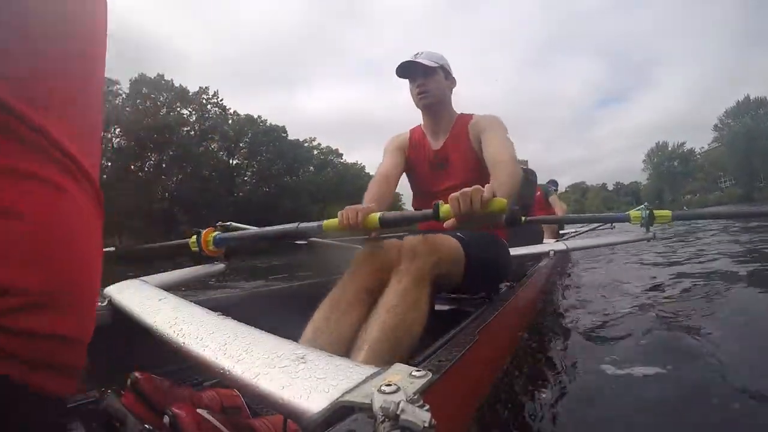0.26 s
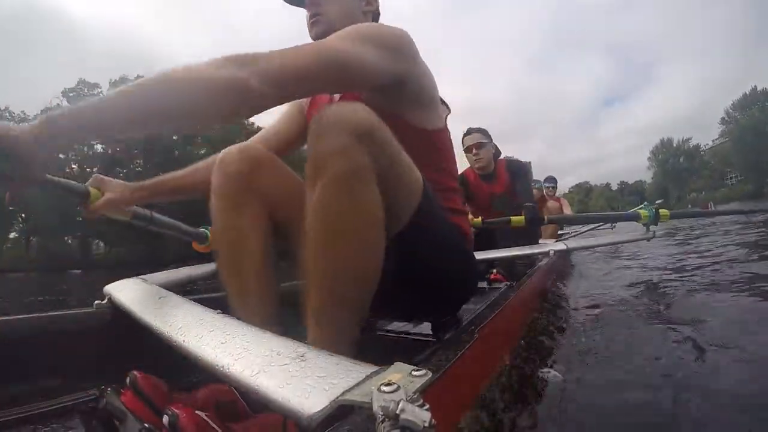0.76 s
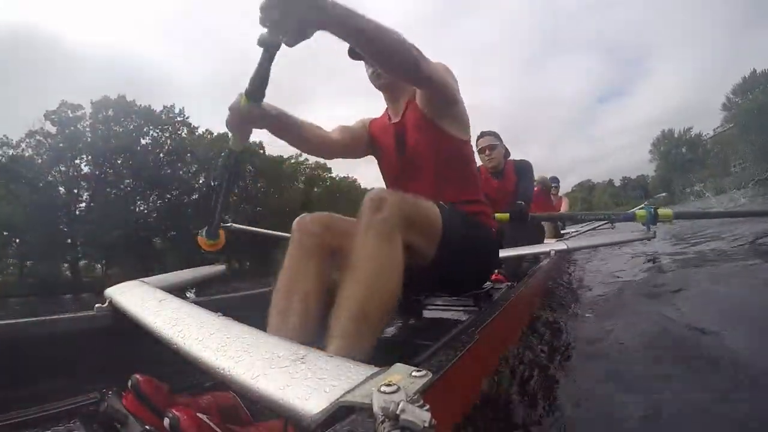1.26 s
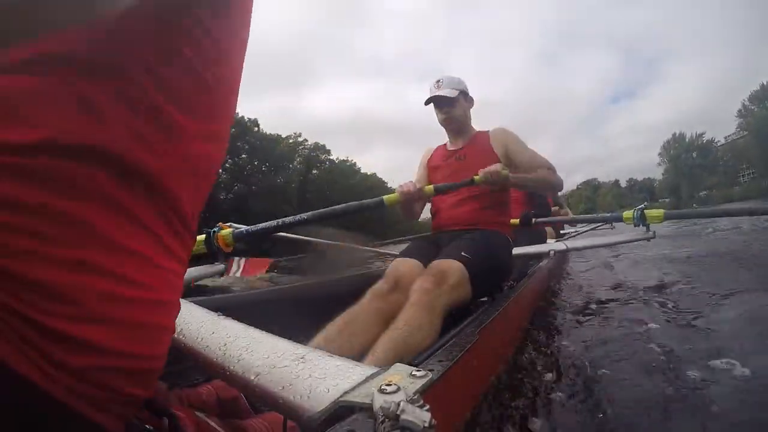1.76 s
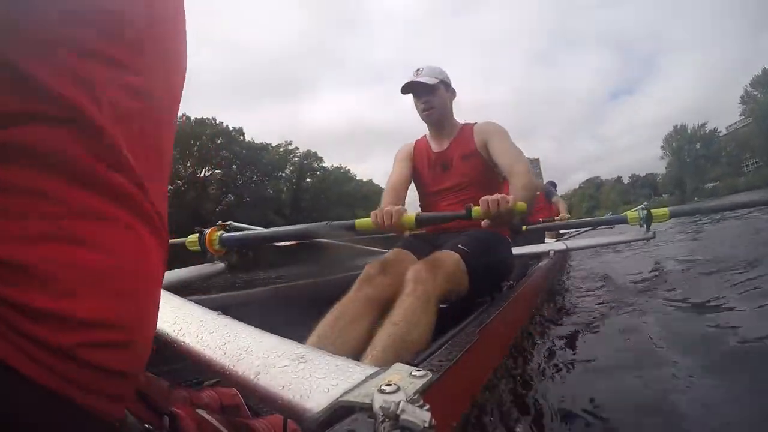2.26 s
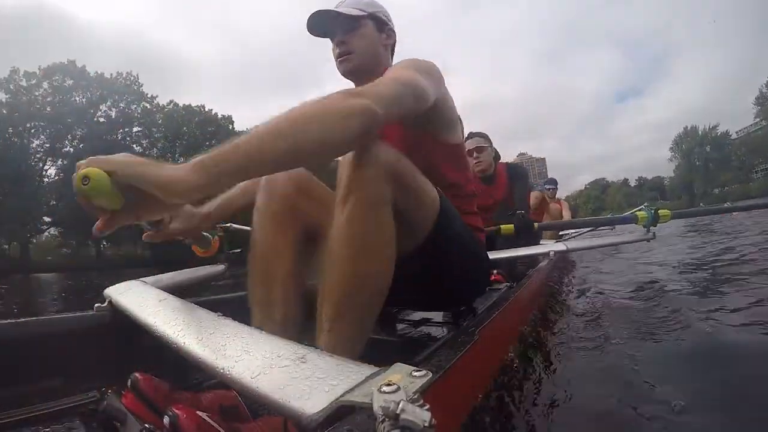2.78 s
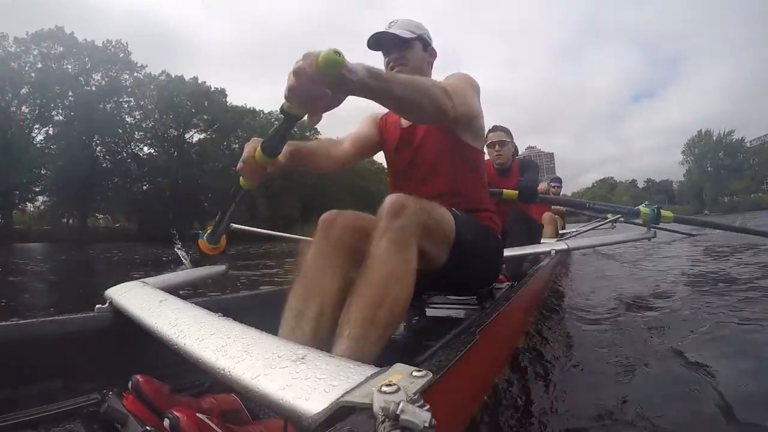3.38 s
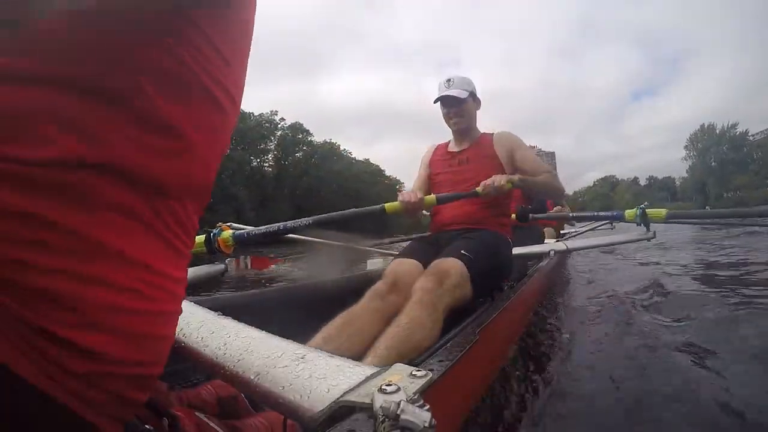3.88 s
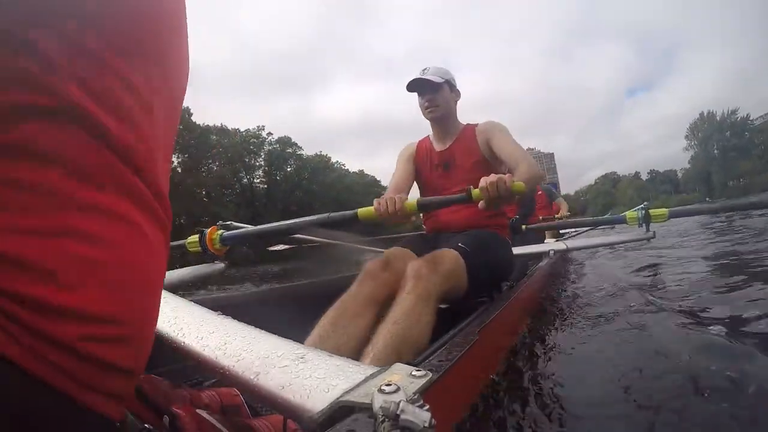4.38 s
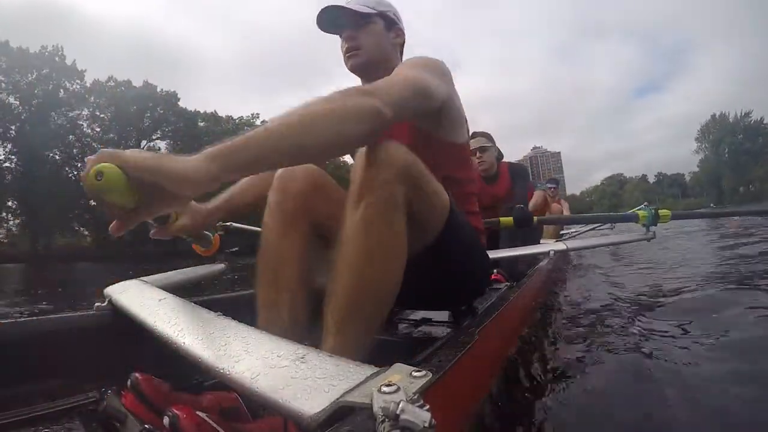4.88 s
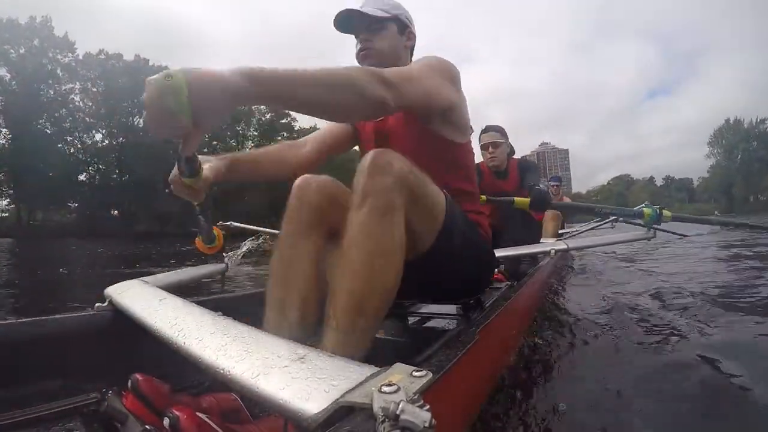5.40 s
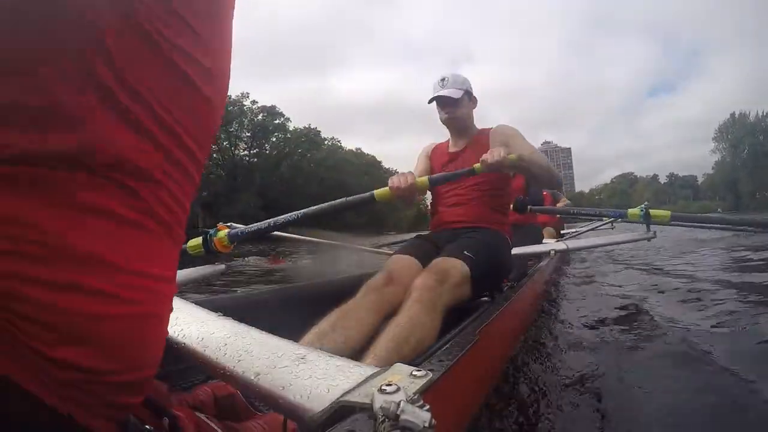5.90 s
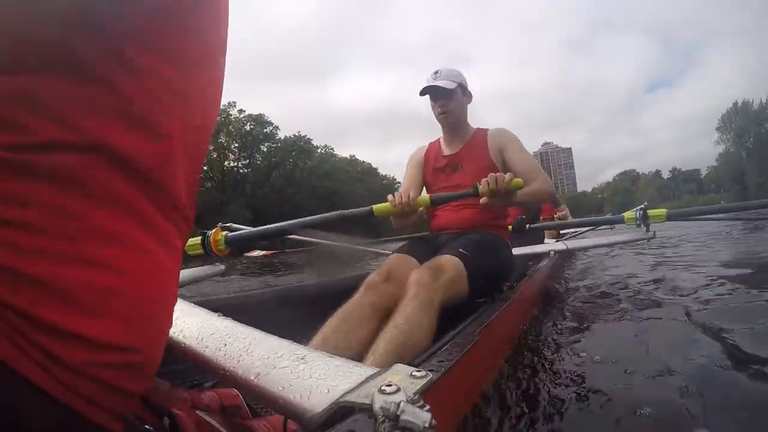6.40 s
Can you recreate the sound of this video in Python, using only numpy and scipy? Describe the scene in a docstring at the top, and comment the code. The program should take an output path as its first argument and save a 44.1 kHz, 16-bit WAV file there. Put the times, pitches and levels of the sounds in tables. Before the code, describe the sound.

Close hull-mounted sound of a rowing boat on open water. From 0.2 s seat wheels rumble grittily, and from 0.4 to 0.7 s oars knock loudly in their locks: dense hollow clacks, plastic ticks, tiny metallic snaps and deep hull thumps. Around 1.4 to 1.9 s, as water rush swells, a lighter seat rumble, knocks and a creaky run of ticks follow. The rush ebbs; at 2.4 to 2.8 s the second loud clatter bursts out. About 3 to 3.3 s is quieter, with low booming and small water slaps, then a thump at 3.4 s and knocks and ticks near 3.8 s within the surge. The third rumble and clatter fill 4.4 to 5 s. A quiet lull with a slap at 5.2 s leads to rolling, knocks and ticks around 5.7 to 6 s. Water rushes, a wavelet slaps at 6.4 s, and a new rumble and thump start at 6.6 s.

```python
"""Seats rumble along their tracks as a racing shell rows three strokes: wheels on grit ring the deck.
Oars knock in their oarlocks, as bursts of noise through resonances, and their collars tick by stick-slip.
The thin hull booms underneath as noise-driven and shoved resonances, heard from a microphone on the hull.
Water rushes past with every surge as coloured grains, wavelets slap the hull, and a fine hiss lies behind."""
import sys
import numpy as np
from scipy import signal
from scipy.fft import rfft, irfft, next_fast_len
from scipy.io import wavfile
from scipy.ndimage import uniform_filter1d, minimum_filter1d, map_coordinates

SR = 44100
rng = np.random.default_rng(int(sys.argv[2]) if len(sys.argv) > 2 else 0)


def put_to_file(sound):
    """Save the sound as 16-bit audio at rate SR, in the file named by the first command-line argument."""
    columns = np.atleast_2d(sound).T  # one column per channel
    safe = np.clip(columns, -1, 1)
    whole_steps = np.round(safe * 32767)
    wavfile.write(sys.argv[1], SR, whole_steps.astype(np.int16))


N = 293265  # length [samples]


def amp(db):
    """Level law: decibels to amplitude gain."""
    return 10 ** (np.asarray(db) / 20)


def unit(x):
    """Power normalisation: scale to rms 1."""
    return x / np.sqrt(np.mean(x ** 2) + 1e-20)


def crest(x):
    """Peak normalisation: scale to peak 1."""
    return x / (np.abs(x).max() + 1e-20)


def swells(rows, attack_s, fall_db_per_s):
    """Exponential build-up and decay: gain rises, holds and dies away for each (start, end, dB) row."""
    t = np.arange(N) / SR
    total = 0
    for start, end, db, *_ in rows:
        rise = 1 - np.exp(-np.maximum(t - start, 0) / attack_s)
        fall_db = fall_db_per_s * np.maximum(t - end, 0)
        total = total + amp(db - fall_db) * rise
    return total


def together(*gains):
    """Energy addition: the strength of unrelated shakings acting at once."""
    return np.sqrt(sum(g ** 2 for g in gains))


def wobble(rate):
    """Slow random modulation: a smooth curve through rate random knots a second."""
    knots = rng.standard_normal(int(N * rate / SR) + 4)
    return map_coordinates(knots, [np.arange(N) * rate / SR])


def filtered(x, response):
    """Linear filtering: multiply the spectrum by a response of frequency."""
    m = next_fast_len(len(x) + SR // 10)
    spectrum = rfft(x, m) * response(np.fft.rfftfreq(m, 1 / SR))
    return irfft(spectrum, m)[:len(x)]


def coloured(x, points):
    """Minimum-phase filtering: a causal filter with the given (Hz, dB) outline, built by cepstrum."""
    hz, db = np.transpose(points)
    size = 2048
    gain = amp(np.interp(np.log(np.fft.rfftfreq(size, 1 / SR) + 1), np.log(hz), db))
    cepstrum = irfft(np.log(gain))
    # folding the cepstrum makes the filter causal
    cepstrum[1:size // 2] *= 2
    cepstrum[size // 2 + 1:] = 0
    impulse = irfft(np.exp(rfft(cepstrum)))
    return signal.fftconvolve(x, impulse)[:len(x)]


def ringing(x, modes, stretch=1):
    """Modal resonance: parallel modes, each a squared second-order band-pass; stretch shifts their pitch."""
    def peak(f, hz, width):
        return (1j * f * width / (hz * hz - f * f + 1j * f * width)) ** 2
    return filtered(x, lambda f: sum(amp(db) * peak(f, hz * stretch, w) for hz, w, db in modes))


def softened(x, hz):
    """Contact compliance: a soft contact passes little above hz."""
    return filtered(x, lambda f: 1 / (1 + 1j * np.sqrt(2) * f / hz - (f / hz) ** 2) ** 2)


def grains(rate, spread_db):
    """Shot noise: random tiny impacts of uneven size, rms 1."""
    hit = rng.random(N) < rate / SR
    return unit(hit * rng.standard_normal(N) * amp(spread_db * rng.standard_normal(N)))


def add(track, s, sound):
    """Superposition: mix a sound in at s seconds."""
    start = max(round(s * SR), 0)
    track[start:start + len(sound)] += sound[:max(N - start, 0)]


def sustained(modes, hold):
    """Steady forced vibration: noise-driven modes, each levelled over hold seconds."""
    out = np.zeros(N)
    for hz, width, db in modes:
        x = ringing(rng.standard_normal(N), [(hz, width, 0)])
        power = np.abs(signal.hilbert(x, next_fast_len(N))[:N]) ** 2
        strength = np.sqrt(np.abs(uniform_filter1d(power, int(hold * SR))) + 1e-20)
        out += amp(db) * x / strength
    return unit(out)


# Runs of the seats: (start [s], end [s], level [dB], length of the treble dip at its start [s])
ROLLS = [(0.203, 0.372, -26, 0.23), (0.404, .54, -28.5, 0.13), (0.591, 0.679, -29.5, 0),
         (1.386, 1.508, -25, 0.14), (1.647, 1.735, -28.5, 0), (2.378, 2.663, -25.5, .24),
         (2.718, 2.776, -29.5, 0), (3.355, 3.419, -42.5, 0), (3.719, 3.871, -31, 0),
         (4.421, 4.555, -29.5, .16), (4.557, 4.934, -27.5, .235), (5.711, 5.873, -25, .17),
         (5.93, 5.996, -29, 0), (6.613, 6.7, -24.5, .1)]
# Colour of the rolling wheels: (frequency [Hz], level [dB])
TRACK = [(150, -33), (280, -0.5), (420, 1), (630, -11), (750, 2.5), (1100, 4), (1350, -21), (1930, -23.5),
         (2380, -7), (2800, -27.5), (3500, -24), (4700, -37), (6000, -35.5), (15000, -58.5)]
# Modes of deck, seat frame and oar sleeve: (frequency [Hz], width of each filter stage [Hz], level [dB])
DECK = [(397.6, 99, -2), (541.3, 75, 1.5), (751, 103, 2.5), (838, 102, -0.5), (966, 160, 1),
        (1045, 110, 2.5), (1107.5, 92, -4.5), (1215.5, 36, 0.5), (1427, 166, -5.5), (1524, 81, -10)]
FRAME = [(106, 53, 0.5), (254, 58, -4)]
SLEEVE = [(2380, 280, 9.5), (2890, 240, 3.5), (3390, 250, 4), (4040, 120, -7), (4137, 230, -2),
          (4560, 71, -4), (5300, 1500, -21)]
ROLL_ATTACK_S, ROLL_FALL_DB_PER_S = 0.021, 204
PITS_PER_S = 90  # mean rate under all the wheels together
PIT_DECK_DB, PIT_RATTLE_DB, PIT_BUMP_DB = -8.5, -21.5, -2.5  # relative to the run


def seats():
    """Rolling contact: wheels on grit ring the deck; at each pit a wheel bumps and the seat frame rattles."""
    level = swells(ROLLS, ROLL_ATTACK_S, ROLL_FALL_DB_PER_S)
    unevenness = amp(2 * wobble(70))

    def grit():
        return level * unit(grains(rate=4000, spread_db=2.0) * unevenness)

    rumble = unit(coloured(grit(), TRACK))
    ring = unit(ringing(grit(), DECK))
    pits = level * (rng.random(N) < PITS_PER_S / SR) * rng.uniform(-1.01, 1, N)
    clatter = amp(PIT_DECK_DB) * unit(ringing(pits, DECK))
    rattle = amp(PIT_RATTLE_DB) * unit(ringing(pits, SLEEVE))
    bump = amp(PIT_BUMP_DB) * unit(ringing(pits, FRAME))
    # each part has one overall strength, so the level of the runs is restored here
    run_rms = np.sqrt(np.mean(level ** 2))
    return run_rms * (amp(-4) * rumble + amp(-6) * ring + clatter + rattle + bump)


# Oars knocking in the oarlocks: (time [s], reference level [dB],
# oarlock ring offset [dB], sleeve crack offset [dB]); each part is also trimmed below
KNOCKS = [(.282, -17, -19, -12.5), (.406, -12.5, -3, -35), (.416, -5.5, -24, -23.5), (0.477, -13, -18, -31),
          (.522, -4, -25, -16), (.528, -7.5, -8, -17), (.585, -7, -17, -24), (0.604, -2, -2.5, -17),
          (.616, -7, -30, -18), (.662, -21, -21, -12), (.685, -13.5, -10.5, -33), (1.514, -19.5, -10, -9),
          (1.592, -13.5, -13, -30), (1.621, -15.5, -2, -26), (1.655, -9, -16, -17.5), (1.693, -10, -7, -33),
          (1.719, -12, -13, -36), (1.868, -15.5, -37, -8), (2.405, -14, -5, -13), (2.479, -14, 1.5, -14.5),
          (2.522, 0, -13, -24), (2.53, -10.5, 8, -19), (2.553, -6.5, -2, -24), (2.648, -2.5, -3.5, -19.5),
          (2.673, -11.5, -23, -35), (2.715, -14.5, -10, -10), (2.722, -10, 9.5, -10.5),
          (2.738, -8, -20, -13), (2.818, -22, -5, -34), (3.024, -26.5, -30, -26), (3.385, -18, -20, -23),
          (3.792, -15.5, -2, -18.5), (3.823, -8.5, -2, -32), (3.902, -24, 5.5, -21),
          (4.547, -11.5, -28, -19), (4.574, -13, -32, -15), (4.675, -12.5, -31, -25),
          (4.689, -10.5, -24, -21), (4.77, -8.5, -28, -43), (4.799, -1.5, -15, -13), (4.819, -13, -3, -36),
          (4.878, -5.5, -3.5, -30), (4.889, -2, -24, -25), (4.946, -17, -18, -18), (5.005, -19, -26, -25),
          (5.047, -29.5, -22, -24), (5.85, -8.5, -10, -38), (5.916, -17, 6, -24), (5.925, -6, -28, -16),
          (6.137, -33, -14, -5.5), (6.611, -19, 1, -18)]
# Colour of a dull blow: (frequency [Hz], level [dB])
BLOW = [(150, -21), (300, 1), (450, -2), (600, -0.5), (1000, 0.5), (1400, -7.5), (1800, -16.5), (2500, -19),
        (5000, -65.5), (12000, -82)]
# Modes of oarlock and hull thud: (frequency [Hz], width of each filter stage [Hz], level [dB])
OARLOCK = [(1012, 78, -4.5), (1224, 74, 3), (1410, 194, -12.5)]
THUD = [(121, 68, -4.5), (201.5, 67, 1.5), (252.5, 47, -1), (332.3, 75, -5.5), (407, 81, -6)]
THUD_DB = -8.5  # relative to the knock's reference level


def knocks():
    """Impact excitation: each oar skids into its seat in a burst of contacts ringing oarlock, sleeve and hull."""
    out, t = np.zeros(N), np.arange(SR // 6) / SR

    def contacts(t60):
        onset = 1 - np.exp(-t / 0.0013)
        decay = amp(-60 * t / t60) + amp(-29.5 - 60 * t / 0.17)  # with a faint slower tail
        return rng.standard_normal(len(t)) * onset * decay

    for s, db, ring_db, crack_db in KNOCKS:
        blow = amp(-5.5) * crest(coloured(contacts(t60=0.057), BLOW))
        deck = amp(-13.5) * crest(ringing(contacts(t60=0.012), DECK))
        ring = amp(ring_db - 3) * crest(ringing(contacts(t60=0.023), OARLOCK))
        scrape = softened(contacts(t60=0.022), hz=7860)
        crack = amp(crack_db + 1.5) * crest(ringing(scrape, SLEEVE))
        thud = amp(THUD_DB) * crest(ringing(contacts(t60=0.015), THUD))
        add(out, s, amp(db) * (blow + deck + ring + crack + thud))
    return out


# Collars turning in runs of jerks: (start [s], number of jerks, gap [s],
# first jerk's level [dB], last jerk's level [dB])
TURNS = [(0.5515, 2, .02, -17.5, -20), (.5924, 2, .0284, -8.5, -10), (.6306, 2, .0112, -12, -14),
         (.694, 2, .019, -24, -27), (0.7347, 2, .0176, -19, -27.5), (1.643, 6, .0207, -21.5, -23),
         (2.752, 2, .0164, -9, -15), (2.7944, 1, .02, -13.5, -12), (3.36, 2, 0.042, -33, -26.5),
         (3.7947, 6, .0198, -18, -25), (4.85, 2, 0.045, -22, -5), (5.011, 3, .019, -19, -20),
         (5.926, 2, .0124, -17, -30), (5.9608, 2, .0184, -18, -23), (6.0136, 1, .02, -29.5, -28)]
# Modes of the plastic collar: (frequency [Hz], width of each filter stage [Hz], level [dB])
COLLAR = [(2450, 353, 10.5), (2970, 530, -18.5), (4200, 740, -10.5), (4570, 700, -38), (6100, 1400, -44.5)]
TICK_HZ, TICK_HZ_PER_DB, TICK_REF_DB = 2321, 5.5, -22.5  # a harder jerk rings higher
TICK_SCATTER_HZ = 60


def collars():
    """Stick-slip friction: a turning oar sticks and slips in runs of dry plastic ticks."""
    out, t = np.zeros(N), np.arange(SR // 20) / SR
    for start, count, gap, first_db, last_db in TURNS:
        for k, db in enumerate(np.linspace(first_db, last_db, round(count))):
            scatter = TICK_SCATTER_HZ * rng.standard_normal()
            hz = TICK_HZ + TICK_HZ_PER_DB * (db - TICK_REF_DB) + scatter
            slip = 0.061 * rng.standard_normal(len(t)) * amp(-60 * t / 0.023)
            slip[0] += 1  # a sharp release, then a little scraping
            tick = crest(ringing(slip, COLLAR, stretch=hz / COLLAR[0][0]))
            tap = amp(-5.0) * crest(coloured(slip, BLOW))
            jitter = .0004 * rng.standard_normal()
            add(out, start + k * gap + jitter, amp(db) * (tick + tap))
    return out


# The gate snapping on its steel pin: (time [s], peak level [dB])
SNAPS = [(.535, -27.5), (.6102, -29), (0.6198, -20), (0.634, -33.5), (0.662, -32.5), (2.534, -23.5),
         (2.7528, -36.5), (4.802, -37), (4.8955, -36)]
# Modes of the pin: (frequency [Hz], width of each filter stage [Hz], level [dB])
PIN = [(5180, 500, 3), (5870, 1540, 2.5), (6900, 2000, -15), (10400, 3600, -12.5)]


def gate_snaps():
    """Modal impact: a short burst of noise rings the steel pin as the gate snaps on it."""
    out, t = np.zeros(N), np.arange(SR // 20) / SR
    for s, db in SNAPS:
        strike = rng.standard_normal(len(t)) * amp(-60 * t / 0.013)
        add(out, s, amp(db) * crest(ringing(strike, PIN)))
    return out


# The hull flexing under the crew's weight: (start [s], end [s], boom level [dB])
HEAVES = [(1.21, 1.27, -33), (1.42, 1.77, -18.5), (1.87, 2.08, -23.5), (3.02, 3.15, -19), (3.16, 3.46, -20),
          (3.6, 3.98, -23.5), (5.24, 5.45, -21.5), (5.55, 5.62, -21), (5.74, 5.9, -17), (6.24, 6.38, -22.5)]
# Heavy shoves on the hull: (time [s], peak of the bending [dB], peak of the panels [dB])
SHOVES = [(0.41, -0.5, -32), (0.522, -2, -26), (.606, -6, -20), (1.42, -4, -32), (1.504, -6, -28),
          (1.649, -14, -15.5), (1.72, -12.5, -31), (1.872, -10, -29), (2.513, 1.5, -16), (2.646, -4, -30),
          (2.739, -13, -21), (3.18, -11.5, -33), (3.361, -3.5, -21), (3.618, -8, -34), (3.793, -4, -22),
          (4.679, -1.5, -15), (4.884, 1, -13.5), (5.259, -8.5, -28.5), (5.54, -10.5, -32),
          (5.773, -5.5, -32), (5.848, -7.5, -12.5), (6.602, -6.5, -22.5)]
# Modes of hull bending and of its panels: (frequency [Hz], width of each filter stage [Hz], level [dB])
BOOM = [(53.6, 13.9, 3.5), (59.8, 5.7, -10), (85.53, 8.9, 0)]
PANEL = [(197.7, 24.6, 10), (261.3, 27, -10.5)]
HULL_ATTACK_S, BOOM_FALL_DB_PER_S, DRONE_FALL_DB_PER_S = 0.026, 77.5, 130.5
BOOM_REST_DB = -35.5  # the boom at its quietest
WATER_BOOM_DB, WATER_DRONE_DB = 9.5, -6.5  # the hull's answer, relative to the water
ROLL_BOOM_DB, ROLL_DRONE_DB = 11, -2  # the hull's answer, relative to the seats
HEAVE_DRONE_DB = -23  # the panels, relative to the boom of a heave
PUSH_S, SHOVE_THUD_DB = 0.0064, -9.5  # time scale of one shove; its thud relative to the panels


def hull(rush_db):
    """Forced vibration: water, seats and crew make the shell boom and panels drone; shoves set both swinging."""
    def shaking(rows, fall):
        return swells(rows, HULL_ATTACK_S, fall)

    heaving = shaking(HEAVES, BOOM_FALL_DB_PER_S)
    bending = together(amp(BOOM_REST_DB), amp(rush_db + WATER_BOOM_DB),
                       amp(ROLL_BOOM_DB) * shaking(ROLLS, BOOM_FALL_DB_PER_S), heaving)
    panels = together(amp(rush_db + WATER_DRONE_DB),
                      amp(ROLL_DRONE_DB) * shaking(ROLLS, DRONE_FALL_DB_PER_S),
                      amp(HEAVE_DRONE_DB) * heaving)
    out = bending * sustained(BOOM, hold=0.18) + panels * sustained(PANEL, hold=0.082)

    u = np.arange(SR // 4) / SR / PUSH_S
    push = np.exp(-u)
    # a rower's weight damps the swing, which widens its modes
    damped = [(hz, 1.13 * width, db) for hz, width, db in BOOM]
    swing = crest(ringing(u * (2 - u) * push, damped))
    thump = crest(ringing(push, PANEL))
    bump = amp(SHOVE_THUD_DB) * crest(ringing(push, THUD))
    for s, swing_db, thump_db in SHOVES:
        add(out, s, amp(swing_db) * swing + amp(thump_db) * (thump + bump))
    return out


# The catches, when the blades enter the water: (time [s])
CATCH_S = [-1.5, .62, 2.75, 4.89]
# Each stroke's own change: (water in the lull after the catch [dB], water in the surge [dB])
VIGOUR = [(-1, -6), (-6.5, -1), (0, -4.5), (0, 0.5)]
# Course shared by all strokes: (time after the catch [s], water rush level [dB], hiss level [dB])
STROKE = [(0, -60, -53), (.2, -55, -57.5), (.48, -50.5, -55), (0.701, -39.5, -53), (1.0, -36.5, -54.5),
          (1.35, -39, -54.5), (1.72, -43.5, -50), (2.13, -52, -55.5)]
LULL_S, HISS_LULL_SHARE = .6, .45  # time scale of the lull; the part of it that the hiss takes
SURGE_S, SURGE_WIDTH_S = 1.01, 0.4  # when after the catch the boat runs fastest; time scale of the surge


def stroke_levels():
    """Periodic modulation: water and hiss levels in dB follow the time since the latest catch."""
    t = np.arange(N) / SR
    latest = np.searchsorted(CATCH_S, t) - 1
    since = t - np.asarray(CATCH_S)[latest]
    lull_db, surge_db = np.asarray(VIGOUR)[latest].T
    lull = lull_db * np.exp(-(since / LULL_S) ** 2)
    surge = surge_db * np.exp(-((since - SURGE_S) / SURGE_WIDTH_S) ** 2)
    s, rush_db, hiss_db = np.transpose(STROKE)
    rush = np.interp(since, s, rush_db) + lull + surge
    return rush, np.interp(since, s, hiss_db) + HISS_LULL_SHARE * lull


# Colour of the rushing water: (frequency [Hz], level [dB])
WATER = [(120, -15.5), (250, -1), (400, -0.5), (630, -10), (800, 2.5), (1130, 0), (1350, -7), (1900, -24.5),
         (2370, -10), (2750, -22.5), (5000, -36), (15000, -60)]


def water(rush_db):
    """Bubble noise: dense random bubbles rush along the hull and ring the deck."""
    froth = unit(coloured(grains(rate=5000, spread_db=0.5), WATER))
    lapping = unit(ringing(grains(rate=690, spread_db=3.5), DECK))
    eddies = amp(.8 * wobble(12))
    return amp(rush_db) * eddies * (amp(-2) * froth + amp(-7.0) * lapping)


# Water slapping the hull: (time [s], level [dB], pitch [Hz], time to fall 60 dB [s])
SLAPS = [(.895, -41, 486, 0.078), (2.915, -43, 660, 0.08), (3.025, -41.5, 1500, .07),
         (3.137, -36, 1520, 0.038), (3.17, -41, 800, 0.28), (3.21, -40, 1200, 0.11), (3.29, -39, 398, .08),
         (5.125, -46, 1080, .08), (5.232, -36.5, 443, 0.17), (6.436, -28.5, 467, 0.1)]
SLAP_WIDTH_HZ, SLAP_FROTH_DB = 360, -5.5  # width of the air pocket's mode; the froth around it


def slaps():
    """Cavity resonance: a wavelet slaps the hull and rings an air pocket amid froth."""
    out, t = np.zeros(N), np.arange(SR // 5) / SR
    for s, db, hz, decay in SLAPS:
        splash = rng.standard_normal(len(t)) * (1 - np.exp(-t / 0.0031)) * amp(-60 * t / decay)
        pocket = crest(ringing(splash, [(hz, SLAP_WIDTH_HZ, 0)]))
        froth = amp(SLAP_FROTH_DB) * crest(coloured(splash, WATER))
        add(out, s, amp(db) * (pocket + froth))
    return out


# Colour of the hiss: (frequency [Hz], level [dB])
HISS = [(300, 2.5), (1000, -1), (3700, -1.5), (5000, -3.5), (7000, -7.5), (10000, -11.5), (15000, -17)]


def hiss(hiss_db):
    """Broadband noise: a fine hiss rises and falls with the stroke."""
    return amp(hiss_db) * unit(coloured(rng.standard_normal(N), HISS))


def treble_dips(x, edge_hz, depth_db):
    """Time-varying filtering: the top of the sound drops away briefly as some seat runs begin."""
    t = np.arange(N) / SR
    spans = [1.0 * ((t > start) & (t < start + length)) for start, _, _, length in ROLLS]
    dipped = uniform_filter1d(np.max(spans, axis=0), SR // 40)
    treble = filtered(x, lambda f: 1 / (1 + (edge_hz / (f + 1)) ** 30))
    return x - treble * (1 - amp(depth_db * dipped))


def scene():
    """Superposition: every source reaches the one microphone on the hull."""
    rush_db, hiss_db = stroke_levels()
    crew = seats() + knocks() + collars() + gate_snaps()
    boat = crew + hull(rush_db) + water(rush_db) + slaps() + hiss(hiss_db)
    return treble_dips(boat, edge_hz=5000, depth_db=-11.0)[None]


TOP_HZ = 15500


def record(dry):
    """Peak limiting and band limiting: a smoothed gain holds the peaks, and nothing above TOP_HZ is kept."""
    size = SR // 100
    needed = np.minimum(1, .95 / (np.abs(dry[0]) + 1e-9))
    gain = uniform_filter1d(minimum_filter1d(needed, size), size)
    return filtered(dry[0] * gain, lambda hz: hz < TOP_HZ)[None]


dry = scene()
out = record(dry)
put_to_file(out)
```